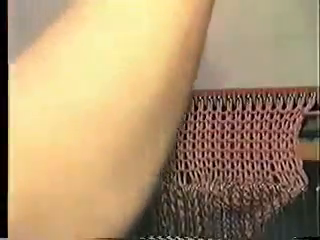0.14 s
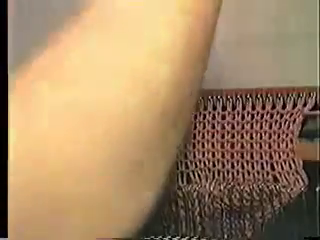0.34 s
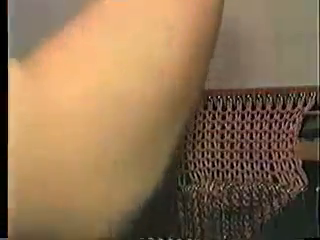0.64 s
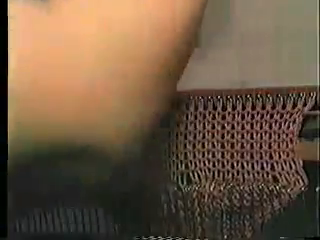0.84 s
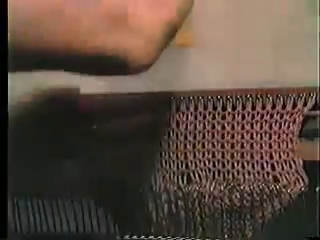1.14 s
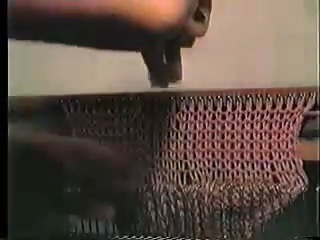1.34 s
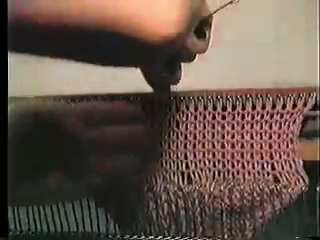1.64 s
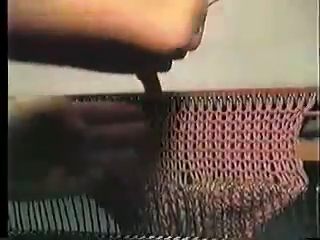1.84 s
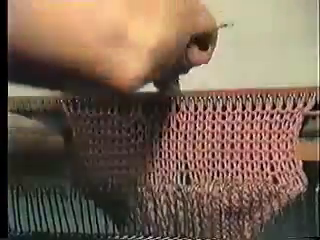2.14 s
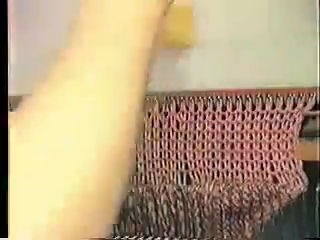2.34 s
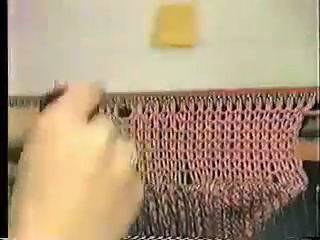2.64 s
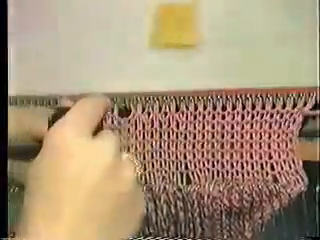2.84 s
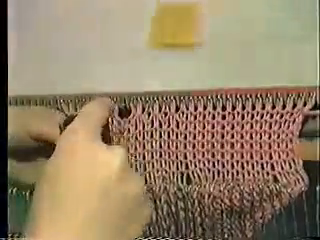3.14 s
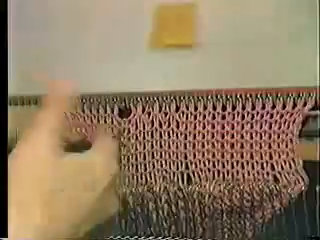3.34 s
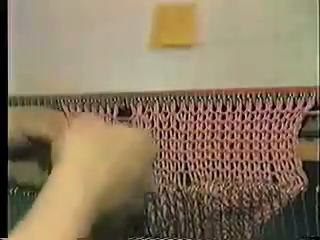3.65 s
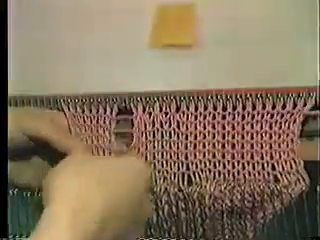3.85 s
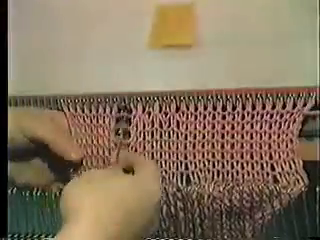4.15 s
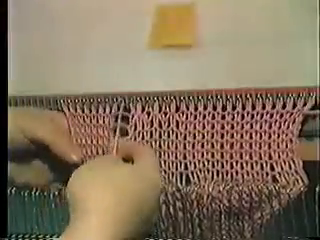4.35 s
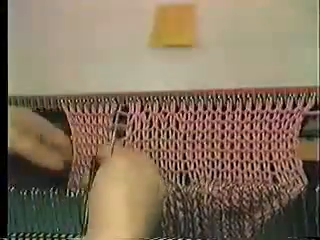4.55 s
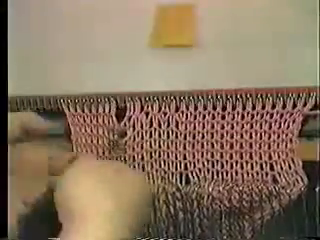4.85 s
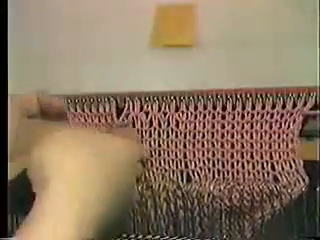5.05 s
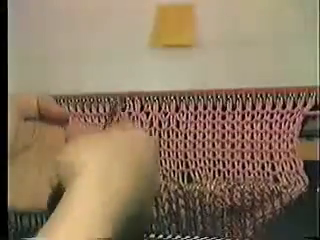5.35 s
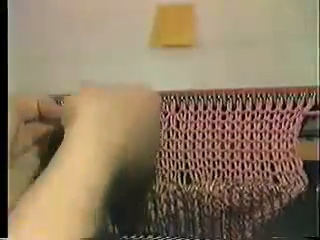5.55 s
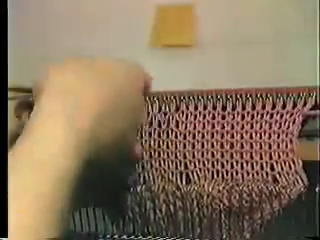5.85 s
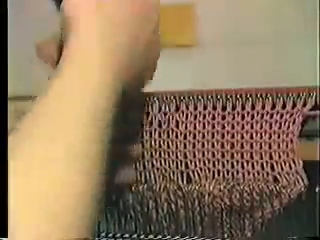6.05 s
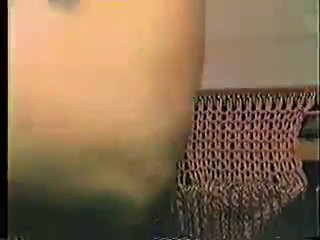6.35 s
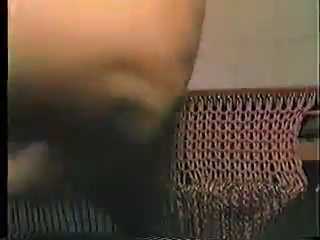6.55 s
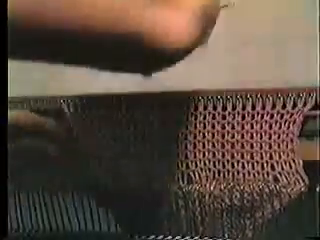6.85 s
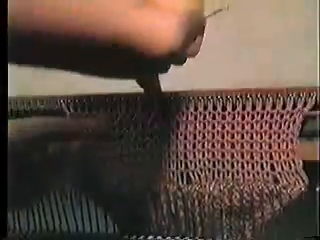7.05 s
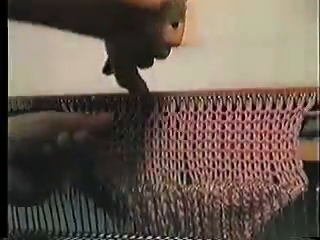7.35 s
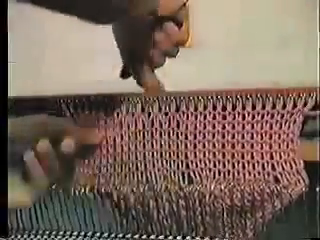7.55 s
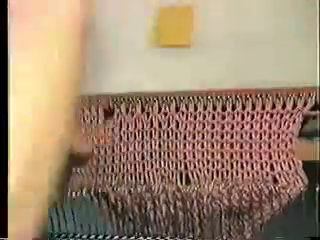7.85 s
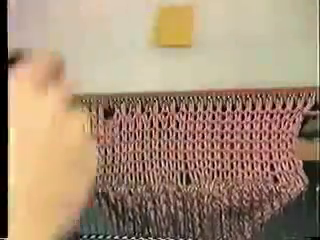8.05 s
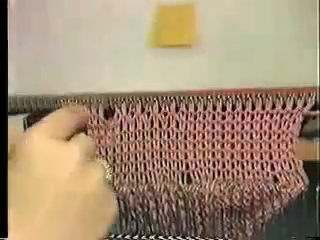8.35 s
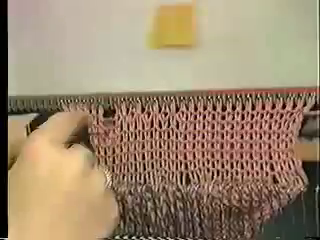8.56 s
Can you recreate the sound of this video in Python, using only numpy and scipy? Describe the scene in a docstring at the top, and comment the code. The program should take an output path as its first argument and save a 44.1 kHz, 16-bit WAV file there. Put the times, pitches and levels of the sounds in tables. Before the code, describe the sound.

In a small room with a faint steady hum and rumble, a hand tool works the needles of a knitting machine. A few metallic clicks come first, then a busy cluster of clacks and knocks, a sparser stretch of light ticks and rubs, and more clusters around one louder clack. Short scrapes and a couple of soft low bumps fall in between. The sound is mono, from a single narrow-band microphone.

```python
"""A small room where stitches are worked by hand on a knitting machine, heard on one narrow-band mic.
Over low rumble and mains hum, tool and yarn rub across the needles. Each needle slides in its slot and
chatters against its stop: the bed knocks, the steel clacks, the latch ticks and the frame shakes.
Now and then a latch flips over by itself, or a hand nudges the frame."""
import sys
import numpy as np
from scipy import signal
from scipy.fft import rfft, irfft
from scipy.io import wavfile
from scipy.ndimage import uniform_filter1d

SR = 44100
rng = np.random.default_rng(int(sys.argv[2]) if len(sys.argv) > 2 else 0)


def inscribe(sig):
    """Save sig as 16-bit PCM at rate SR to the path in sys.argv[1].

    A 1-D sig is mono; a 2-D sig holds one channel per row.
    Samples are clipped to [-1, 1] before scaling.
    """
    pcm = np.round(np.clip(np.atleast_2d(sig).T, -1, 1) * 32767)
    wavfile.write(sys.argv[1], SR, pcm.astype(np.int16))


N = 383229
HIT_SAMPLES, PRE_ROLL_S = 12288, .012  # the buffer of one hit, and its run-up to the impact
HIT_T, HIT_HZ = np.arange(HIT_SAMPLES) / SR, np.fft.rfftfreq(HIT_SAMPLES, 1 / SR)
BAND_EDGE_HZ = 7760


def amp(db):
    """Decibels to gain."""
    return 10 ** (np.asarray(db) / 20)


def unit_rms(x):
    """Scales to an rms of 1."""
    return x / np.sqrt(np.mean(x ** 2) + 1e-20)


def curve_at(points, hz):
    """Reads a curve on a log-frequency axis."""
    f, value = np.transpose(points)
    return np.interp(np.log(hz + 1), np.log(f + 1), value)


def add(mix, s, sound):
    """Mixes a sound in at time s."""
    part = mix[max(round(s * SR), 0):][:len(sound)]
    part += sound[:len(part)]


def colour(x, db):
    """Minimum-phase EQ with a gain for each bin: it rings only after the blow."""
    log_gain = np.log(amp(np.maximum(db, -100)))
    mirrored = np.concatenate([log_gain, log_gain[-2:0:-1]])
    response = np.exp(np.conj(signal.hilbert(mirrored)))[:len(db)]
    return irfft(rfft(x) * response)


def resonance(hz, centre, width):
    """Power response of one resonance."""
    return 1 / (1 + (2 * (hz - centre) / width) ** 2)


def at_level(hit, db):
    """Sets a hit's rms level over the 15 ms after impact."""
    attack = hit[round(PRE_ROLL_S * SR):][:round(.015 * SR)]
    return amp(db) * hit / np.sqrt(np.mean(attack ** 2) + 1e-20)


# Room tone, rumble up to hiss: (frequency [Hz], relative level [dB])
ROOM_TONE = [(12, -45.5), (20, -12), (49, -4.5), (150, -5), (179, -7.5), (208, -7), (295, -9.5), (418, -12),
             (654, -15), (950, -15), (1020, -15.5), (1910, -20.5), (2570, -22.5), (6310, -29.5),
             (7700, -31.5), (10000, -67), (16900, -120)]
# Mains hum and faint whines: (frequency [Hz], level [dB])
HUM_TONES = [(60, -52), (180, -53), (300, -65.5), (657, -69.5), (996, -61), (1470, -65.5), (1690, -63)]
def background(room_tone_db=-41.5):
    """Steady rumble and hiss, with mains hum and whines on top."""
    t, hz = np.arange(N) / SR, np.fft.rfftfreq(N, 1 / SR)
    spectrum = amp(curve_at(ROOM_TONE, hz)) * (hz < BAND_EDGE_HZ)
    air = irfft(rfft(rng.standard_normal(N)) * spectrum, N)
    hum = sum(np.sqrt(2) * amp(db) * np.sin(2 * np.pi * (f * t + rng.random())) for f, db in HUM_TONES)
    return amp(room_tone_db) * unit_rms(air) + hum


# The room's short reverb: (frequency [Hz], t60 [s])
ROOM_DECAY = [(300, 0.19), (800, 0.32), (2500, 0.2), (5000, 0.21), (7500, 0.21)]
def in_room(x, wet_db, send=None, build_up_s=0.007):
    """Adds a diffuse tail, each band dying at its own speed; send, if given, feeds it in place of x."""
    hz, t, noise = signal.stft(rng.standard_normal(HIT_SAMPLES), SR, nperseg=256)
    decay = amp(-60 * t / curve_at(ROOM_DECAY, hz)[:, None])
    tail = signal.istft(noise * decay, SR, nperseg=256)[1][:HIT_SAMPLES]
    tail *= 1 - np.exp(-(HIT_T / build_up_s) ** 2)
    wet = signal.fftconvolve(x if send is None else send, tail)[:len(x)]
    return unit_rms(x) + amp(wet_db) * unit_rms(wet)


# Broad body of the steel: (frequency [Hz], gain [dB])
STEEL_BODY = [(150, -37.5), (400, -6), (700, 2.5), (1400, -1), (2300, -2), (4200, -2), (5500, -4),
              (6500, -2), (7700, -6)]
# Rings of the needles and slots: (frequency [Hz], width [Hz], level relative to the body [dB])
STEEL_RINGS = [(1945, 97, 2.5), (2305, 72, 1), (2600, 58, -0.5), (2830, 35, 1), (3930, 21, -3),
               (4020, 170, 1), (4650, 120, 3.5), (6360, 91, -1.5)]
def steel_eq():
    """The needles' tone in dB: a broad body topped by narrow resonances."""
    rings = sum(amp(db) ** 2 * resonance(HIT_HZ, hz, width) for hz, width, db in STEEL_RINGS)
    return curve_at(STEEL_BODY, HIT_HZ) + 10 * np.log10(1 + rings)


def friction(length_s, db, centre_hz, grit_db=4, octave_off_db=-5):
    """One sliding contact: gritty noise swells and fades, coloured by the steel."""
    stroke = signal.windows.tukey(round(length_s * SR), .7)
    grit = amp(grit_db * unit_rms(uniform_filter1d(rng.standard_normal(HIT_SAMPLES), size=60)))
    drive = np.zeros(HIT_SAMPLES)
    add(drive, 0, stroke)
    drive *= grit * rng.standard_normal(HIT_SAMPLES)
    focus_db = octave_off_db * np.log2((HIT_HZ + 1) / centre_hz) ** 2
    rub = in_room(colour(drive, steel_eq() + focus_db), wet_db=-4)
    return amp(db) * rub * np.sqrt(len(stroke)) / np.linalg.norm(rub)


# Rub cues: (time [s], length [s], level [dB], centre [Hz])
RUB_CUES = [(.14, 0.051, -45, 1550), (1.128, 0.036, -42, 3000), (1.17, 0.069, -50, 2000),
            (3.723, 0.052, -45.5, 870), (5.457, 0.047, -46, 2510), (5.488, 0.026, -37, 1150),
            (5.85, 0.048, -33.5, 3000), (6.219, 0.089, -44.5, 910), (6.453, 0.13, -48, 2400),
            (6.79, .084, -47.5, 3870), (6.995, 0.036, -44, 2210), (7.285, 0.037, -43, 2000),
            (7.655, .07, -45, 2600), (7.918, .19, -52.5, 4040)]
def rubs():
    """Tool and yarn rub over the needles."""
    out = np.zeros(N)
    for s, length_s, db, centre_hz in RUB_CUES:
        add(out, s, friction(length_s, db, centre_hz))
    return out


def slides(lead_s=.036):
    """Each needle slides in its slot just before it meets the stop."""
    out = np.zeros(N)
    for s, *_, slide_db in CLICK_CUES:
        add(out, s - lead_s, friction(length_s=0.052, db=slide_db, centre_hz=3300))
    return out


def chatter(chatter_s, rise_share=0.37, lumpy_db=1.5, graze_db=-21, graze_share=0.74):
    """A needle grazes its slot, then meets its stop in a dense run of tiny impacts."""
    t = HIT_T - PRE_ROLL_S
    lumps = np.clip(unit_rms(uniform_filter1d(rng.standard_normal(HIT_SAMPLES), size=40)), -2, 2)
    blow = np.exp(-np.logaddexp(-t / (rise_share * chatter_s), t / chatter_s))
    graze = amp(graze_db) * np.exp(-abs(t) / (graze_share * chatter_s))
    return rng.standard_normal(HIT_SAMPLES) * amp(lumpy_db * lumps) * (blow + graze)


# Modes of the needle bed: (frequency [Hz], relative level [dB], t60 [s])
BED_MODES = [(680, -19, 0.051), (754, -14, 0.13), (845.5, -12.5, 0.11), (958, -4, 0.064), (1074, 0, 0.022),
             (1116.5, 6, 0.039), (1290, -6, 0.012)]
def bed_knock(chatter_s, centre_hz, chatter_gain=0.93, rise_s=0.002, rebound_s=.0125, rebound_db=-10):
    """A push and its chatter ring the bed; the place struck favours the modes near centre_hz."""
    wide_knock = colour(chatter(chatter_s), 20 * np.log10(resonance(HIT_HZ, 0.95 * centre_hz, width=480)))
    blow = chatter(chatter_s)
    blow *= chatter_gain / np.linalg.norm(blow)
    blow[round((PRE_ROLL_S - .001) * SR)] += 1  # the push
    drive = blow.copy()
    add(drive, rebound_s * rng.uniform(.9, 1.4), amp(rebound_db) * blow)  # the bed springs back
    ring = np.zeros(HIT_SAMPLES)
    for hz, db, t60 in BED_MODES:
        detune = 1 + 0.008 * rng.standard_normal()  # the hands load the bed differently each time
        weight = np.sqrt(resonance(hz, centre_hz, width=450))
        ring += weight * amp(db - 60 * HIT_T / t60) * np.sin(2 * np.pi * hz * detune * HIT_T)
    ring *= 1 - np.exp(-HIT_T / rise_s)
    knock = signal.fftconvolve(drive, ring)[:HIT_SAMPLES]
    return in_room(knock, wet_db=-10, send=wide_knock)


# Rings that all needle shanks share: (frequency [Hz], level relative to the body [dB])
SHANK_RINGS = [(2350, 5.5), (2830, 0.5)]
def steel_clack(chatter_s, ring_hz, ring_db, tilt_db_per_octave, low_cut_cycles=3.5):
    """A needle clacks; how far it stands out of its slot sets its ring, and a quick blow sounds thin."""
    contact = chatter(chatter_s)
    undertone = (0.702 * ring_hz, ring_db - 8.5)  # the needle also bends the other way
    rings = [*SHANK_RINGS, (ring_hz, ring_db), undertone]
    ring_power = sum(amp(db) ** 2 * resonance(HIT_HZ, hz, width=220) for hz, db in rings)
    needle_db = 10 * np.log10(1 + ring_power)
    treble_octaves = np.log2(np.maximum(HIT_HZ, 1800) / 1800)
    thin_db = -10 * np.log10(1 + (low_cut_cycles / (chatter_s * (HIT_HZ + 1))) ** 2)
    body_db = steel_eq() + tilt_db_per_octave * treble_octaves + thin_db
    # the walls gather sound from all sides of the machine, which evens out the rings
    wide_clack = colour(contact, body_db + 0.55 * needle_db)
    return in_room(colour(contact, body_db + needle_db), wet_db=-5, send=wide_clack)


# Thin, bright tone of a latch: (frequency [Hz], gain [dB])
LATCH_EQ = [(2000, -47), (5500, -30.5), (6500, -10.5), (7100, 2), (7500, 6.5), (7800, -4)]
def latch_tick(chatter_s, wet_db):
    """The tiny latch rattles at the very top of the treble."""
    return in_room(colour(chatter(chatter_s), curve_at(LATCH_EQ, HIT_HZ)), wet_db)


# Needle cues: (time [s], chatter decay [s], knock level [dB], knock centre [Hz], clack level [dB],
#               ring pitch [Hz], ring strength [dB], tick level [dB], slide level [dB])
CLICK_CUES = [(.405, 0.0052, -37.5, 980, -30, 2800, 7, -36, -51),
              (.432, 0.008, -36, 1100, -44, 2880, 7, -55, -60),
              (.520, 0.0039, -30.5, 1100, -30, 2180, 11, -33.5, -63),
              (.5265, .007, -29.5, 1090, -26, 2640, 18, -30.5, -56),
              (1.7051, 0.0064, -55, 840, -31.5, 2840, 11, -34, -47),
              (1.8366, .006, -20.5, 1027, -31.5, 2110, 4, -40, -59),
              (2.0043, 0.0042, -45.5, 910, -37, 3870, 20, -47, -47),
              (2.0332, 0.0076, -51, 960, -25, 4950, 10, -30, -49),
              (2.0815, 0.0039, -39.5, 830, -33.5, 2640, 17, -42, -44),
              (2.1032, .006, -28, 870, -22.5, 3710, 19, -26.5, -43),
              (2.211, 0.0056, -35, 1030, -31, 2670, 7, -33.5, -43.5),
              (2.639, 0.0083, -40.5, 895, -37, 1930, 10, -40, -62),
              (3.3319, .0027, -27.5, 1210, -22, 4120, 15, -34, -53),
              (3.342, 0.0021, -29.5, 1190, -32, 2880, 26, -50, -62),
              (5.049, 0.0031, -29, 1000, -30.5, 6500, 11.5, -30, -47),
              (5.620, 0.0062, -25, 1170, -36, 5220, 19, -41.5, -45),
              (5.832, 0.0065, -42.5, 990, -29.5, 3940, 15, -34, -45),
              (5.915, .005, -49, 1100, -38, 5900, 2, -31.5, -51),
              (5.921, 0.0066, -39, 1100, -29, 5740, 10, -28, -53),
              (6.0997, 0.012, -42.5, 1050, -38.5, 4400, 5, -43, -49),
              (6.3975, 0.0082, -19, 1019, -19.5, 6340, 5.5, -26, -60),
              (7.358, .004, -25.5, 994, -30, 3900, 16, -41.5, -59),
              (7.549, .005, -47, 1050, -33.5, 4860, 13, -44, -43.5),
              (7.557, 0.0065, -31.5, 1060, -31.5, 4820, 22, -43.5, -55),
              (7.608, 0.0086, -29, 983, -28, 4950, 7, -32.5, -40),
              (7.614, 0.013, -32, 1020, -31, 4870, 8, -40, -52)]
def clicks(neutral_tick_db=-5):
    """A needle hits its stop, sounding bed, steel and latch in its own balance."""
    out = np.zeros(N)
    for s, chatter_s, knock_db, knock_hz, clack_db, ring_hz, ring_db, tick_db, _ in CLICK_CUES:
        # a blow near the hook ticks the latch and brightens the clack alike
        tilt = np.clip(0.38 * (tick_db - clack_db - neutral_tick_db), -5, 5)
        knock = at_level(bed_knock(chatter_s, knock_hz), knock_db)
        clack = at_level(steel_clack(chatter_s, ring_hz, ring_db, tilt), clack_db)
        tick = at_level(latch_tick(chatter_s, wet_db=-5.5), tick_db)
        add(out, s - PRE_ROLL_S, knock + clack + tick)
    return out


def frame_thud(db, centre_hz):
    """The heavy frame answers slowly, with a broad, damped resonance."""
    frame_eq = 20 * np.log10(resonance(HIT_HZ, centre_hz, width=0.74 * centre_hz))
    body = in_room(colour(chatter(chatter_s=0.016), frame_eq), wet_db=-13.5)
    loudest_rms = np.sqrt(uniform_filter1d(body ** 2, size=1300).max())
    return amp(db) * body / loudest_rms


# Resonances of the frame: (frequency [Hz], relative level [dB])
FRAME_MODES = [(710, 0), (436, -9), (175, -10)]
def shakes(coupling_db=-4.5, dull_below_hz=987, loss_db_per_hz=0.33, delay_s=0.00496):
    """Every knock on the bed shakes the frame, the duller knocks most."""
    out = np.zeros(N)
    for s, _, knock_db, knock_hz, *_ in CLICK_CUES:
        shake_db = knock_db + coupling_db - loss_db_per_hz * max(knock_hz - dull_below_hz, 0)
        for hz, db in FRAME_MODES:
            add(out, s + delay_s - PRE_ROLL_S, frame_thud(shake_db + db, hz))
    return out


# Latch cues: (time [s], chatter decay [s], tick level [dB], hook level [dB])
FLICK_CUES = [(1.7702, 0.0047, -28.5, -36), (2.3787, 0.01, -28, -45), (2.5128, 0.0034, -37, -45),
              (3.132, .006, -46, -42), (3.154, .004, -50, -47), (3.612, 0.0078, -36, -52),
              (3.714, .006, -39.5, -57), (3.907, 0.0047, -46, -41.5), (5.393, .009, -42, -38.5),
              (5.452, .0016, -22, -33), (8.002, .02, -37.5, -50), (8.042, 0.0068, -33.5, -48),
              (8.228, .004, -51, -43)]
def flicks():
    """A latch flips over by itself against its steel hook, leaving the bed still."""
    out = np.zeros(N)
    for s, chatter_s, tick_db, hook_db in FLICK_CUES:
        tick = latch_tick(chatter_s, wet_db=-8)
        hook = steel_clack(chatter_s, ring_hz=5680, ring_db=9, tilt_db_per_octave=3)
        add(out, s - PRE_ROLL_S, at_level(tick, tick_db) + at_level(hook, hook_db))
    return out


# Nudge cues: (time [s], level [dB], centre [Hz])
NUDGE_CUES = [(3.845, -40, 90.5), (3.862, -39, 180), (6.39, -39, 54.4)]
def nudges():
    """A hand bumps the frame: a soft, low thud."""
    out = np.zeros(N)
    for s, db, centre_hz in NUDGE_CUES:
        add(out, s - PRE_ROLL_S, frame_thud(db, centre_hz))
    return out


def scene():
    """Everything reaches one microphone, the same on both channels."""
    mono = clicks() + flicks() + slides() + rubs() + nudges() + shakes() + background()
    return np.array([mono, mono])


def record(dry):
    """A steep low-pass gives the narrow-band sound."""
    low_pass = signal.firwin(1023, BAND_EDGE_HZ, window=("kaiser", 8), fs=SR)
    return signal.oaconvolve(dry, low_pass[None], "same")


dry = scene()
out = record(dry)
inscribe(out)
```